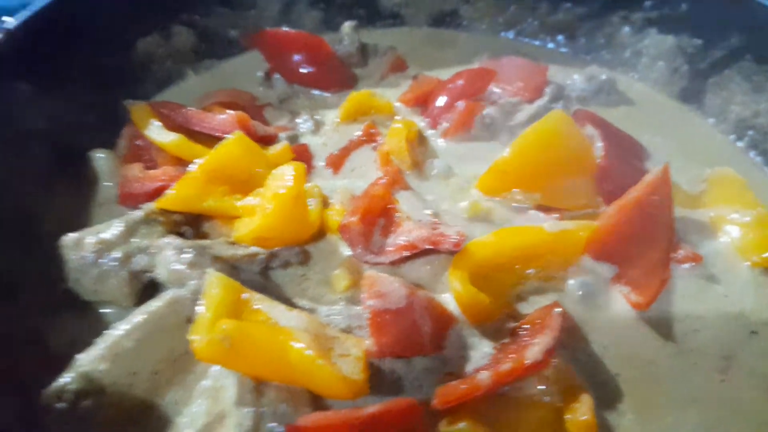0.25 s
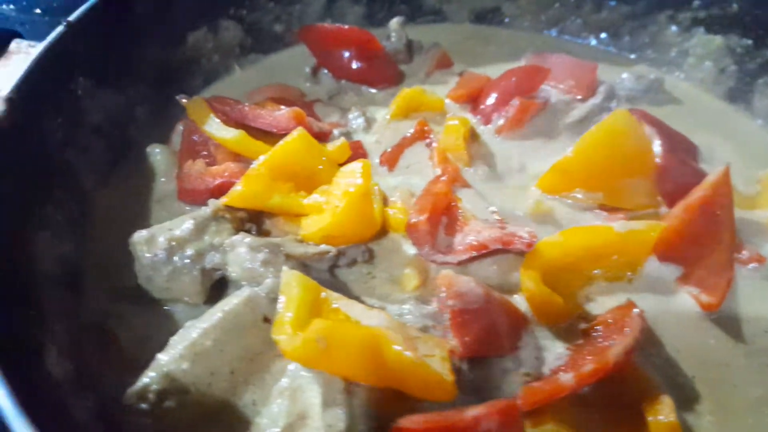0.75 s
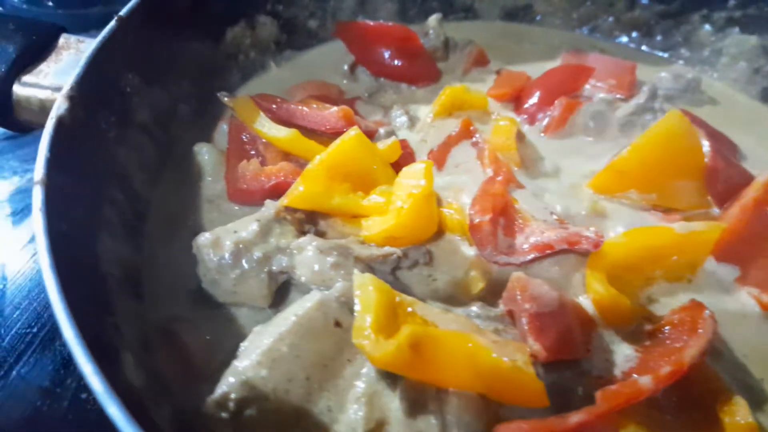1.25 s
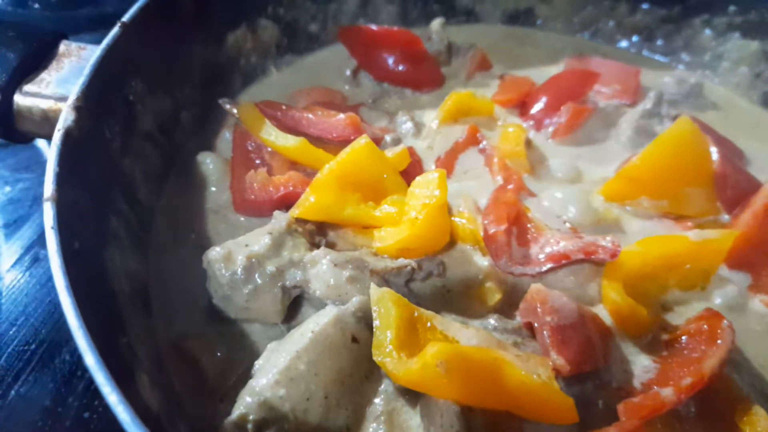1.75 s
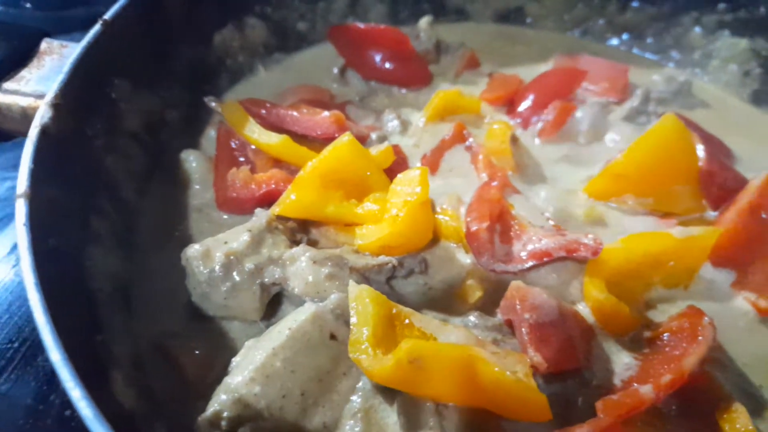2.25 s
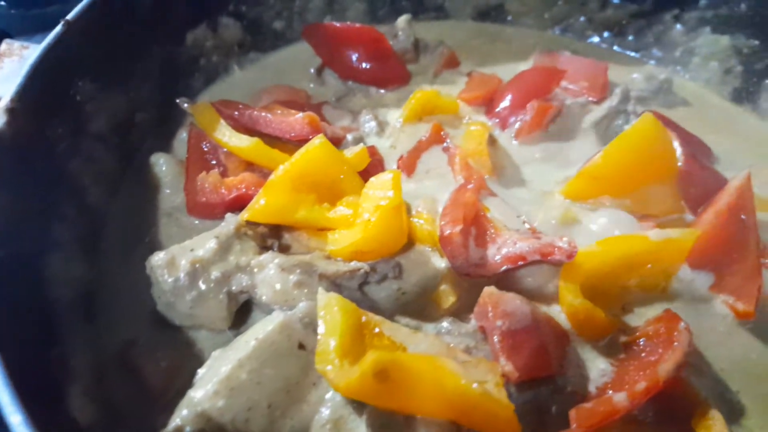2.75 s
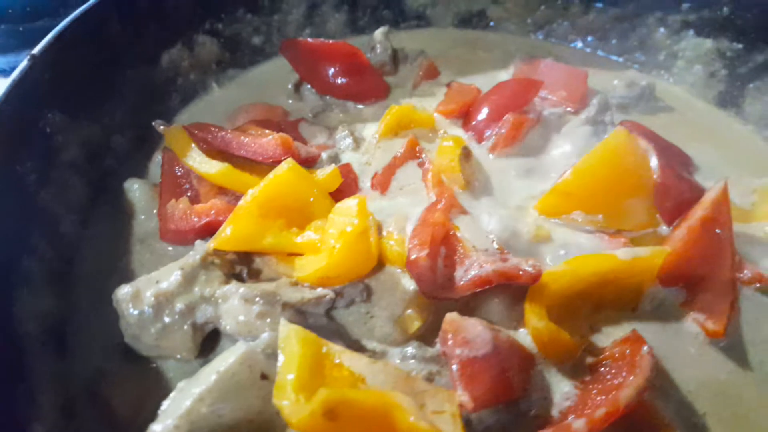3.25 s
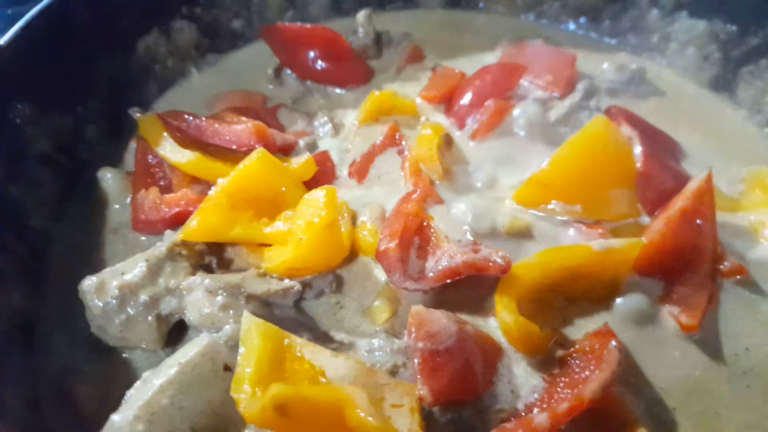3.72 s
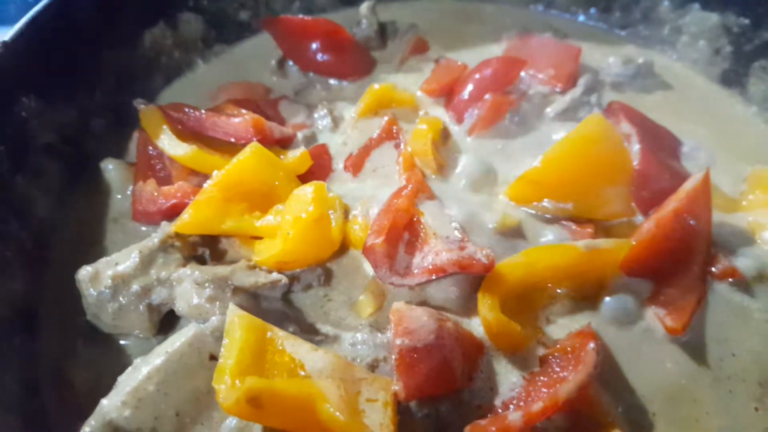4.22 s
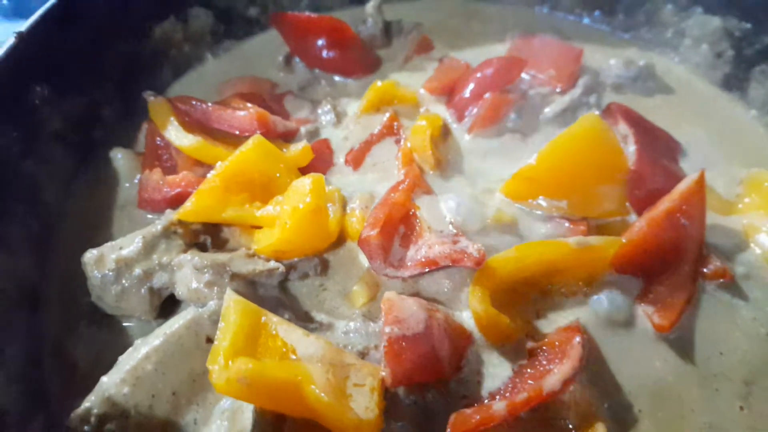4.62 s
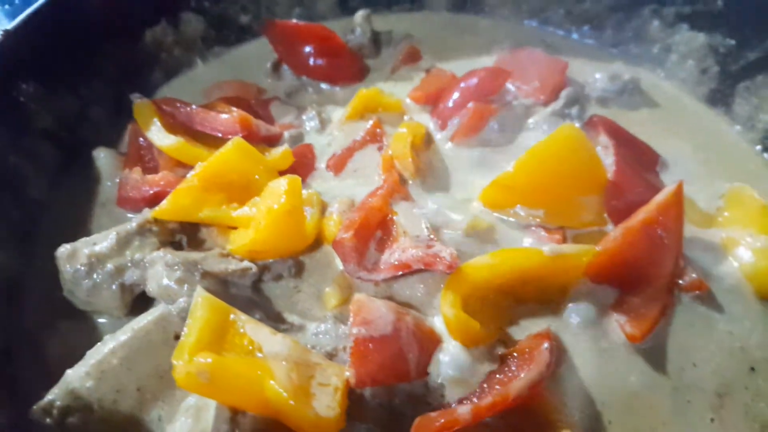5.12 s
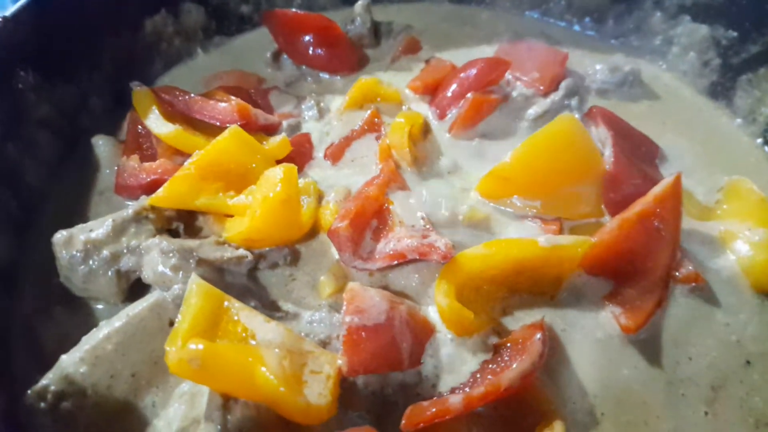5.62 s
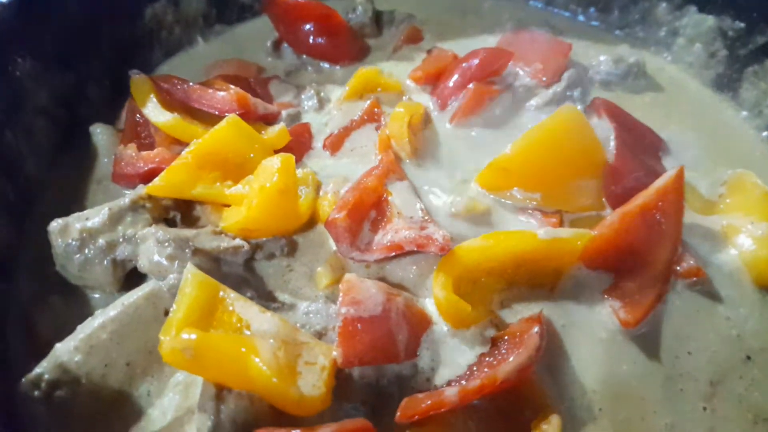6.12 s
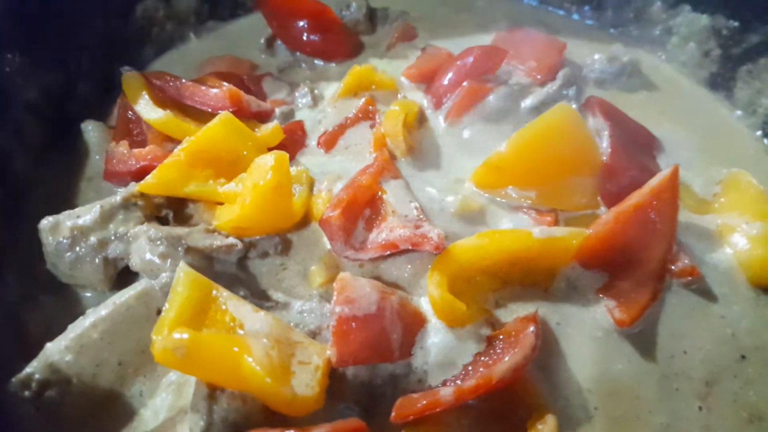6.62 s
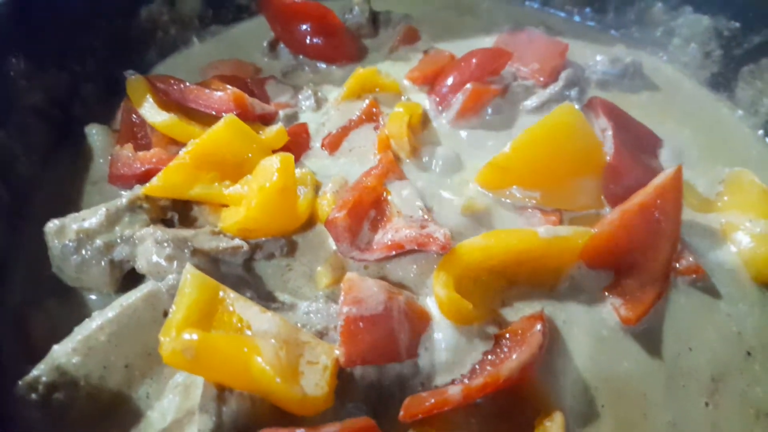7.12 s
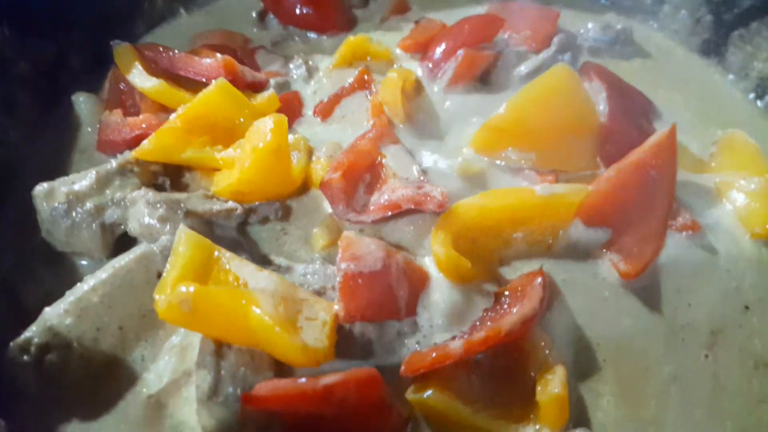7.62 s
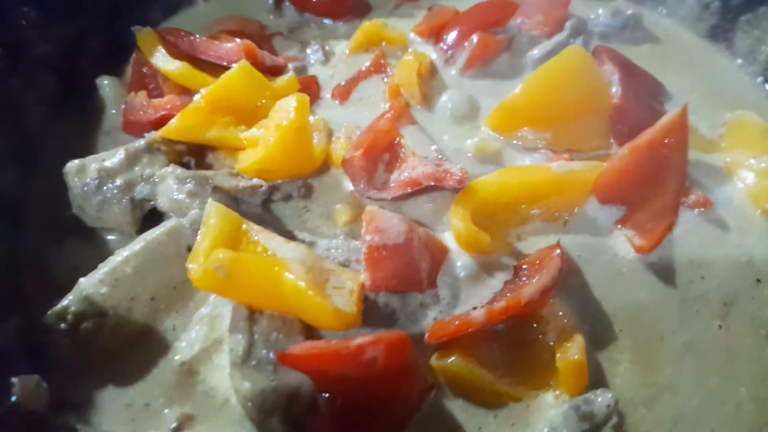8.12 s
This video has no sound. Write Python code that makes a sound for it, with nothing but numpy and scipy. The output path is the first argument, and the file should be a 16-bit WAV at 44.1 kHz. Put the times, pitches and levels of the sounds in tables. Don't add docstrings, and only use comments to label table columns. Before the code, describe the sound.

A creamy sauce with chunks of peppers and tomato simmers in a frying pan, heard very close in a small kitchen. Hollow bubble pops and sharp little cracks come in irregular clusters over fine fizzing steam and a steady low hum. One pop stands out near two seconds; around five the burner swells and a hard crack lands with a brief sizzle. Another hard crack comes near the end, and the simmering continues.

```python
import sys
import numpy as np
from scipy import signal
from scipy.io import wavfile
from scipy.ndimage import uniform_filter1d

SR = 44100
rng = np.random.default_rng(int(sys.argv[2]) if len(sys.argv) > 2 else 0)


def output_pcm(signal):
    pcm = np.clip(np.atleast_2d(signal).T, -1, 1) * 32767
    wavfile.write(sys.argv[1], SR, np.round(pcm).astype(np.int16))


def voltage_ratio(decibels):
    exponent = np.asarray(decibels, float) / 20
    return 10 ** exponent


N = 369111

# frequency in Hz, level in dB.
LEFT_PORT_COLOUR = [(400, -3.5), (700, 5), (1600, 0), (2100, -3.5), (3200, -1.5), (6300, -8.5), (8800, -6),
                    (10100, -25), (12000, -26), (15700, -38)]
RIGHT_PORT_COLOUR = [(400, -2), (1700, 1), (2300, -5), (4000, -4.5), (5500, -2.5), (7600, -9), (8800, -23),
                     (13000, -29.5), (15000, -26), (15600, -31)]
# start in seconds, peak in dB, ring in Hz.
SKIN_CRACKS = [(0.36, -28, 3800), (0.3975, -29.5, 3200), (1.2354, -24.5, 3100), (1.26, -31, 4100),
               (1.4203, -25.5, 3020), (1.4243, -26.5, 5700), (1.709, -26.5, 4230), (1.8638, -27.5, 3080),
               (2.1476, -29.5, 2470), (2.938, -28, 3560), (3.299, -25, 3440), (3.6037, -24, 3860),
               (4.311, -26.5, 3100), (4.316, -28, 3080), (4.4076, -26, 3940), (4.604, -29.5, 4030),
               (4.737, -23, 4330), (5.004, -26, 3930), (5.122, -18, 3580), (5.136, -30, 5700),
               (5.4236, -27, 3750), (6.053, -28.5, 5300), (6.914, -21.5, 3680), (6.923, -29, 3970),
               (6.978, -26, 3970), (7.094, -27, 3660), (7.128, -23, 3600), (7.355, -27.5, 3700),
               (7.7184, -17.5, 3730), (7.822, -21.5, 2760), (7.934, -48, 2730), (8.101, -36, 2900),
               (8.237, -27, 2980)]
# start in seconds, peak in dB, ring in Hz.
MORE_CRACKS = [(0.182, -28, 3660), (0.505, -33, 3770), (0.543, -33, 3100), (0.726, -32, 3820),
               (0.754, -36, 4160), (0.851, -32.5, 2570), (0.9724, -33, 3040), (1.1198, -29.5, 3330),
               (1.5834, -31, 4100), (1.638, -32.5, 3140), (1.7816, -30.5, 4200), (1.933, -31, 3020),
               (2.082, -28.5, 4080), (2.165, -33, 4940), (2.309, -35, 4000), (2.753, -30, 2780),
               (2.79, -29, 4100), (3.145, -31.5, 3880), (3.4868, -34, 3010), (3.9572, -29, 3950),
               (5.25, -30, 3670), (5.487, -30.5, 3560), (5.64, -31, 3600), (6.2597, -30.5, 5470),
               (7.3807, -28.5, 3080), (8.159, -36, 3870)]
# start in seconds, peak in dB, ring in Hz.
FAINT_SNICKS = [(0.017, -33.5, 4600), (0.043, -39, 2970.0), (0.113, -36, 2950), (0.7208, -36.5, 3700.0),
                (0.9663, -32, 2660), (1.9863, -35.5, 2850), (2.1394, -31, 2910.0), (2.314, -33.5, 3910.0),
                (2.781, -29.5, 2750), (2.962, -37, 2760), (3.0484, -32.5, 2730.0), (3.1811, -38, 3850.0),
                (7.4865, -40.5, 2800), (3.7417, -33, 2590.0), (3.776, -33.5, 3220), (4.016, -32, 3330),
                (4.0818, -35, 4000), (4.3017, -31, 4480.0), (4.3266, -32, 2980), (4.571, -38, 2900.0),
                (4.575, -36, 4050.0), (4.598, -29, 3300), (4.65, -34.5, 4030.0), (4.6788, -37.5, 2590.0),
                (4.979, -34, 3250), (5.093, -35, 3400.0), (5.346, -32.5, 4800), (5.367, -34, 3510.0),
                (5.417, -28, 2750), (5.539, -34, 2650), (5.7747, -42, 4970.0), (5.8695, -40, 4770),
                (5.8935, -40, 2700), (6.199, -37, 3050), (6.4698, -35, 3500), (6.712, -40, 3100),
                (6.9717, -30, 2650), (7.105, -35, 2980.0), (7.2731, -34, 4000), (7.29, -36, 3990.0),
                (7.312, -36, 3120.0), (7.4227, -35, 4700), (7.573, -36, 3300), (7.6999, -32, 2280),
                (7.7067, -33, 5750.0), (7.764, -30.5, 2850), (8.154, -33, 6380.0), (8.247, -30, 2680)]
# start in seconds, peak in dB, finest spray in dB above the rest.
BURST_SPITS = [(0.2156, -32, -3), (0.8484, -33.5, -7), (1.7094, -31, -26), (1.938, -39, -4),
               (1.9993, -42, -1), (2.3019, -34, -5.5), (2.4623, -32.5, -7), (2.597, -34.5, -3),
               (2.9615, -50.5, 13), (3.0942, -36, -5), (3.5176, -33, -10), (3.6033, -35, -30),
               (3.833, -34, -43), (3.8846, -40, -4), (3.9676, -34.5, -4), (4.224, -29, -10),
               (4.382, -34, -4), (4.7367, -26.5, -9), (5.0053, -33, -8), (5.122, -25, -8),
               (5.1305, -37, -16), (5.1374, -28.5, -8), (6.055, -32.5, -6.5), (6.3808, -33, 0),
               (6.915, -42, -3), (6.9488, -36.5, -1), (6.988, -47, 2), (7.8546, -32, -81),
               (8.1726, -38.5, 1), (8.1763, -34.5, -26)]


def evened(x):
    return x / np.sqrt(np.mean(x ** 2) + 1e-20)


def read(points, hz):
    f, value = np.transpose(points)
    return np.interp(np.log(hz + 1), np.log(f + 1), value)


def along(rows, t):
    return np.interp(t, *np.transpose(rows))


def add(mix, s, sound):
    part = mix[:, max(round(s * SR), 0):][:, :sound.shape[1]]
    part += sound[:, :part.shape[1]]


def smoothed_noise(size):
    once = uniform_filter1d(rng.standard_normal(N), size=size)
    return evened(uniform_filter1d(once, size=size))


def ports(x):
    hz = abs(np.fft.fftfreq(4096, 1 / SR))
    gain_db = np.array([read(LEFT_PORT_COLOUR, hz), read(RIGHT_PORT_COLOUR, hz)])
    spectrum = np.exp(np.conj(signal.hilbert(np.log(voltage_ratio(gain_db)))))
    taps = np.fft.ifft(spectrum).real[:, :1024]
    return signal.oaconvolve(x, taps, axes=1)[:, :N]


def lean(hz, side):
    pan_db = read(LEFT_PORT_COLOUR, hz) - read(RIGHT_PORT_COLOUR, hz) + 5.2 * (side - .5)
    return voltage_ratio(np.array([[.5], [-.5]]) * pan_db)


def ring(hz, cycles, swell, phase=np.pi, glide=0):
    turns = np.arange(600) / SR * hz
    shape = (1 - np.exp(-turns / swell)) ** 2 * np.exp(-turns / cycles)
    bent_turns = turns * (1 + glide * (turns - 2 * cycles) / 2)
    return shape / shape.max() * np.sin(2 * np.pi * bent_turns + phase)


def hum():
    # time in seconds, hum level in dB.
    level = [(0.0, -36), (1.2, -38.5), (2.4, -37), (3.6, -36), (4.8, -36.5), (6.0, -35), (7.2, -35.5),
             (8.4, -35.5)]
    # frequency in Hz, level in dB per Hz.
    colour = [(40, -27), (59, 2.5), (68, -3), (97, 4), (133, -4), (168, -6), (200, -12.5), (262, -6),
              (330, -14.5), (435, -26), (520, -27), (565, -21), (1085, -28), (1400, -47)]
    # time in seconds, level in dB.
    roar = [
        (0, -48),
        (4.7, -49),
        (5.0, -42.5),
        (5.7, -47.5),
        (6.1, -50),
        (7.3, -45.5),
        (8.37, -51.5),
    ]
    # frequency in Hz, left-right likeness (0-1).
    likeness = [(60, 0.98), (130, 0.98), (290, 0.92), (640, 0.39), (1400, 0.11)]
    # frequency in Hz, left over right in dB.
    balance = [(90, -0.5), (140, -4.5), (330, -3.5), (500, -2.5), (1100, -3.5)]
    frames, hz = N // 2048 + 5, np.fft.rfftfreq(8192, 1 / SR)
    a, b, c, d = rng.standard_normal((frames, 4097, 4)).T
    same = np.clip(read(likeness, hz), -1, 1)[:, None]
    left = a + 1j * b
    right = same * left + np.sqrt(1 - same ** 2) * (c + 1j * d)
    lean_db = np.outer([.5, -.5], read(balance, hz))
    roar_db = along(roar, np.arange(frames) * 2048 / SR - .05)
    flame = np.exp(-(np.log((hz + 1) / 314) / 0.2) ** 2)
    colour_db = (read(colour, hz) + lean_db)[:, :, None]
    z = np.array([left, right]) * voltage_ratio(colour_db + np.outer(flame, roar_db - roar_db.mean()))
    x = evened(signal.istft(z, nperseg=8192, noverlap=6144)[1][:, :N])
    return x * voltage_ratio(along(level, np.arange(N) / SR) - 1.0)


def duct():
    # frequency in Hz, width in Hz, level in dB.
    whistles = [(557, 11.6, -57.5), (1047, 13, -66)]
    out = np.zeros(N)
    for hz, width, db in whistles:
        resonance = signal.iirpeak(hz, hz / width, fs=SR)
        out += voltage_ratio(db) * evened(signal.lfilter(*resonance, rng.standard_normal(N)))
    return out


def self_noise():
    band = signal.butter(6, [11000, 14600], "bandpass", fs=SR, output="sos")
    hiss = evened(signal.sosfilt(band, rng.standard_normal(N)))
    return np.array([[0], [voltage_ratio(-62)]]) * hiss


def all_pops():
    # start in seconds, peak in dB, cavity in Hz, ring in cycles.
    blips = [(0.2202, -31, 1290, 2.1), (0.449, -27.5, 1606, 4.1), (0.8993, -30.5, 1740, 1.7),
             (1.7485, -30, 1110, 2.6), (1.9292, -27, 1840, 1.5), (2.3851, -25.5, 1820, 1.5),
             (2.4293, -23, 1090, 1.1), (2.7158, -31, 683, 2.2), (3.18, -33, 1630, 2.5),
             (3.6128, -29, 1700, 2.6), (4.0807, -29, 1470, 1.5), (4.464, -32.5, 1550, 3.4),
             (4.72, -27.5, 1590, 1.7), (4.8034, -30, 984, 1.3), (5.4494, -27, 1650, 3.4),
             (5.7155, -31.5, 1920, 2.9), (6.0122, -35, 1090, 2.2), (6.0325, -31, 1480, 1.7),
             (6.0683, -33, 1400, 1.9), (6.2584, -31.5, 1580, 1.6), (6.516, -32, 1640, 10),
             (6.7074, -29, 1710, 1.3), (6.8988, -28, 1430, 1.7), (7.0965, -26.5, 1580, 1.7),
             (7.1096, -28.5, 1820, 2), (7.359, -28, 1760, 1.3), (7.6595, -29.5, 1260, 1.7),
             (7.981, -35, 1090, 2.7), (8.029, -28, 1120, 0.74), (8.2549, -30.5, 1760, 1.4)]
    # start in seconds, peak in dB, cavity in Hz.
    plops = [(0.0615, -25, 830), (0.0862, -31, 1190), (0.142, -30.5, 790), (0.3039, -34, 720),
             (0.9525, -24, 1260), (1.088, -34, 745), (1.2525, -27, 1190), (1.3977, -32, 1090),
             (1.6492, -31, 1090), (1.9024, -31, 890), (2.5507, -26, 1010), (2.6205, -32.5, 810),
             (3.095, -27.5, 895), (3.285, -29.5, 920), (3.3555, -33, 980), (3.67, -32, 744),
             (3.733, -30, 950), (3.777, -29, 1110), (4.3442, -30, 940), (4.9321, -23, 800),
             (4.979, -29, 860), (5.0056, -31, 766), (5.294, -30, 820), (5.5979, -27.5, 1100),
             (5.7072, -27.5, 1030), (6.284, -34, 905), (6.4314, -30, 960), (6.9143, -32.5, 1160),
             (7.9075, -25.5, 1040), (8.3622, -28, 700)]
    # start in seconds, peak in dB, cavity in Hz.
    pips = [(0.0171, -30.5, 1550), (0.181, -29, 1660), (0.435, -29.5, 1540), (0.6988, -25.5, 1690),
            (0.828, -27, 1580), (1.2066, -22.5, 1430), (1.8637, -13.5, 1700), (1.9222, -25.5, 1710),
            (1.9993, -26, 1820), (2.1033, -27, 1480), (2.1394, -26.5, 1740), (2.452, -24, 1830),
            (3.169, -27, 1440), (4.311, -26, 1580), (5.0932, -26.5, 1290), (5.226, -24.5, 1250),
            (5.3218, -28.5, 1750), (5.7542, -21, 2390), (5.7898, -27, 1470), (5.805, -23, 2510),
            (5.812, -27.5, 1390), (6.3203, -25.5, 1490), (6.3363, -28, 1430), (6.483, -25.5, 1430),
            (6.529, -25, 1800), (6.6771, -25.5, 1370), (7.2605, -28, 1480), (7.3375, -25, 1550),
            (7.5683, -26, 1470), (8.2374, -27, 2250)]
    # start in seconds, peak in dB, cavity in Hz.
    further_pops = [(0.339, -36.5, 776), (1.052, -32.5, 990), (1.5, -32.5, 1680), (2.272, -33.5, 1120),
                    (2.296, -33, 1090), (2.818, -38, 706), (3.478, -36, 1070), (3.505, -30.5, 1630),
                    (3.879, -33, 655), (4.555, -30, 1350), (5.438, -29, 1480), (5.528, -31.5, 1150),
                    (3.6093, -30, 1430), (5.848, -31.5, 600), (5.891, -34, 1750), (7.116, -34, 1940),
                    (7.196, -32.5, 1610), (7.5735, -28, 1390), (8.246, -30.5, 1690), (0.417, -33, 1760),
                    (2.565, -31, 1610), (2.8965, -31, 1800), (4.811, -33, 1600), (7.299, -36, 1400),
                    (3.368, -31, 1440), (7.534, -29, 2380), (7.613, -31, 1560), (8.328, -36, 1540)]
    # start in seconds, peak in dB, cavity in Hz.
    pearls = [(0.3564, -30.5, 1800), (1.2587, -35, 980), (1.7081, -31, 1680), (2.3616, -35, 830),
              (2.6027, -38, 725), (2.9389, -37, 1020.0), (2.9853, -38, 694), (3.0469, -38, 570),
              (3.4407, -34.5, 1520), (3.5478, -36.5, 760.0), (3.8674, -36, 1000), (3.9565, -34, 1030),
              (4.0153, -35, 770), (4.0962, -37, 1030), (4.9013, -33.5, 676), (4.9524, -32, 830.0),
              (5.1232, -33, 1890), (5.2092, -35, 940.0), (5.2157, -40, 1120), (5.2413, -33, 570),
              (5.3085, -30.5, 1060), (5.3664, -38, 1040.0), (5.4156, -34, 1030), (5.4866, -37, 1720.0),
              (5.6382, -37, 714), (5.8042, -28.5, 970), (5.8768, -34, 1030), (6.0058, -33, 730),
              (6.2203, -34, 820), (6.2445, -39, 750), (6.3614, -34, 1540), (6.3896, -35, 720),
              (6.4402, -34, 1360), (6.5077, -35.5, 820), (6.5576, -36.5, 710.0), (6.7844, -36.5, 710),
              (6.8856, -34, 1130), (6.9545, -31, 1470), (6.9807, -32.5, 1050), (7.2285, -38, 700),
              (7.3801, -36, 1620), (7.5107, -38, 726), (7.6999, -28, 1780), (8.1597, -31, 1670),
              (8.2056, -30, 1050), (8.2248, -44, 1140.0), (8.2646, -39, 1020)]
    closing = ((plops, 0.68), (pips, 0.66), (further_pops, 1.27), (pearls, 1))
    return list(blips) + [(*row, cycles) for rows, cycles in closing for row in rows]


def boil():
    rise_s, fall_s = 0.009, 0.028
    surge_db, calm_db, follows = 0.5, -2, 0.4
    t = np.arange(0, N, 64) / SR
    power = voltage_ratio(2 * calm_db)
    bursts = all_pops() + list(SKIN_CRACKS) + list(MORE_CRACKS) + list(FAINT_SNICKS) + list(BURST_SPITS)
    for s, db, *_ in bursts:
        away = np.where(t < s, (s - t) / rise_s, (t - s) / fall_s)
        power = power + voltage_ratio(2 * (surge_db + follows * (db + 30))) * np.exp(-away ** 2)
    return np.interp(np.arange(N) / SR, t, 10 * np.log10(power))


def steam(boil_db):
    hiss = evened(ports(rng.standard_normal((2, N))))
    return voltage_ratio(-53.0) * hiss * voltage_ratio(1.8 * smoothed_noise(200) + .34 * boil_db)


def gurgle(boil_db):
    starts = rng.random(N) < 30 * voltage_ratio(boil_db) / SR
    size = voltage_ratio(3 * np.minimum(rng.exponential(1, N), 3)) * starts
    kind = rng.integers(0, 6, N)
    lumps = np.zeros(N)
    for k, hz in enumerate(np.geomspace(234, 683, 6)):
        lumps += signal.oaconvolve(size * (kind == k), ring(hz, 0.5, 0.4))[:N]
    return voltage_ratio(-57.5 + np.array([[-1.5], [0]])) * evened(lumps)


def fizz(boil_db):
    out = np.zeros((2, N))
    per_s = 650 * voltage_ratio(1.9 * boil_db)
    size = np.minimum(.2 + rng.exponential(1, N), 1.3) * (rng.random(N) < per_s / SR)
    kind = rng.integers(0, 24, N)
    for k, hz in enumerate(np.geomspace(420, 15000, 24)):
        cycles, step, side = rng.uniform([1.5, -1, 0], [5, 1, 1])
        lag = step * 2 * np.pi * hz * 0.0001
        pair = np.array([ring(hz, cycles, 0.37, 0), ring(hz, cycles, 0.75, lag)])
        pair *= np.array([[1 + side], [2 - side]]) * (hz / 2000) ** 0.84 / cycles ** .5
        hits = voltage_ratio(size * (11.5 - 0.1 * k)) * (size > 0) * (kind == k)
        out += signal.oaconvolve(hits[None], pair, axes=1)[:, :N]
    return voltage_ratio(-51.5 + 0.049 * boil_db) * evened(ports(out))


def sizzles():
    # start in seconds, length in seconds, level in dB.
    collapses = [
        (0.71, 0.052, -52),
        (5.126, 0.04, -45),
        (5.722, 0.03, -40.5),
        (7.13, 0.035, -49),
        (7.308, 0.052, -49),
    ]
    out = np.zeros((2, N))
    for s, length, db in collapses:
        u = np.arange(4000) / SR / length
        ragged = uniform_filter1d(rng.standard_normal(4000), size=60) ** 2 * 60 + .5
        swell = np.sqrt(u) * np.exp(-u ** 2)
        add(out, s, voltage_ratio(db) * swell * ragged * rng.standard_normal((2, 4000)))
    band = signal.butter(2, [2300, 6800], "bandpass", fs=SR, output="sos")
    return ports(signal.sosfilt(band, 2 * out))


def droplets():
    # start in seconds, peak in dB.
    drops = [(0.488, -39), (0.8924, -44.5), (0.997, -48), (1.2815, -39), (1.304, -42), (1.503, -41),
             (2.147, -37.5), (2.7945, -37), (4.252, -36.5), (4.368, -37.5), (4.556, -46), (4.689, -41),
             (4.9496, -41), (5.514, -47), (5.5627, -41.5), (5.8543, -37), (6.431, -43), (6.4686, -38),
             (6.6344, -41), (6.7222, -38.5), (6.873, -43), (7.066, -43.5), (7.0277, -37.5), (7.33, -39),
             (7.509, -40), (7.6092, -36), (7.6854, -34), (7.8664, -41)]
    return [(s, db, -10 + 9.5 * share) for (s, db), share in zip(drops, rng.random(len(drops)))]


def spits():
    # start in seconds, peak in dB.
    mists = [(0.0175, -37), (1.9954, -41), (2.1636, -37), (2.7553, -37), (3.3084, -38), (3.833, -26),
             (4.7215, -35), (5.15, -43), (5.2585, -39), (5.3454, -35), (5.5035, -45), (5.5165, -34),
             (5.6388, -42), (5.881, -40), (6.2183, -38), (6.2319, -46), (6.5625, -40), (7.101, -32),
             (7.334, -44), (7.3552, -38), (7.718, -41), (7.8583, -31), (8.1872, -40), (8.2055, -35)]
    coarse, fine = np.zeros((2, 2, N))
    bursts = list(BURST_SPITS) + droplets()
    bursts += [(s, db - 13.5, -9) for s, db, hz in SKIN_CRACKS + MORE_CRACKS + FAINT_SNICKS]
    bursts += [(s, db - 24, 13.5) for s, db in mists]
    u = np.arange(900) / SR / 0.00095
    snap = u ** 2 * np.exp(2 - 2 * u)
    hissing_tail = 0.041 * (1 - np.exp(-u)) * np.exp(-u / 7)
    spray = rng.standard_normal((len(bursts), 2, 900)) * (snap + hissing_tail)
    for (s, db, fine_db), drops in zip(bursts, spray):
        add(coarse, s - .0006, drops * voltage_ratio(db + 12.5))
        add(fine, s - .0006, drops * voltage_ratio(db + fine_db + 28.5))
    middle = signal.butter(2, [3500, 9800], "bandpass", fs=SR, output="sos")
    top = signal.butter(3, 10000, "highpass", fs=SR, output="sos")
    return ports(signal.sosfilt(middle, coarse) + signal.sosfilt(top, fine))


def cracks():
    # start in seconds, peak in dB, ring in Hz.
    pings = [(0.0439, -36, 8270.0), (0.2158, -20, 8400), (0.2354, -24, 7100), (1.7879, -28, 7400),
             (1.9884, -35, 8840.0), (2.2056, -27, 6800), (2.3143, -28, 8750), (2.5501, -35, 8570.0),
             (2.7548, -36.0, 8840.0), (2.7624, -37.0, 8530.0), (3.1636, -31, 8750), (3.2993, -36, 7390.0),
             (3.3087, -36, 7180.0), (3.5174, -26, 6890.0), (3.603, -18, 6860.0), (3.8759, -36, 8700.0),
             (4.043, -30, 6690.0), (4.3267, -26, 8450.0), (4.5978, -28, 7900), (4.8364, -28, 7100),
             (4.9205, -26, 7020.0), (4.9908, -33, 8900.0), (5.1312, -30, 8690.0), (1.219, -43, 5600),
             (5.7749, -34, 8800), (5.8433, -32, 8880.0), (5.87, -24, 7520.0), (5.9918, -29, 7500),
             (6.3267, -24, 6900), (6.482, -29, 7960.0), (6.5137, -30.5, 9200), (6.636, -39, 8500),
             (6.728, -35, 8600.0), (7.101, -35.5, 6980.0), (7.2338, -24, 8600), (7.8673, -24, 9000),
             (8.1551, -38, 6500.0), (8.1764, -35, 8460.0)]
    skins = SKIN_CRACKS + MORE_CRACKS + FAINT_SNICKS + [(s, db - 8.5, hz) for s, db, hz in pings]
    out, chance = np.zeros((2, N)), rng.random((len(skins), 3))
    for (s, db, hz), (size, step, side) in zip(skins, chance):
        cycles = (0.00051 + 0.00017 * size) * hz
        pair = np.array([ring(hz, cycles, 0.6), ring(hz, cycles, 0.7, np.pi + 1.9 * (step - .5))])
        level = voltage_ratio(db - 2.0 + np.array([[1.2], [-1.2]]))
        add(out, s - .00035, pair * level * lean(hz, side))
    return out


def pops():
    bubbles = all_pops()
    out, chance = np.zeros((2, N)), rng.random((len(bubbles), 2))
    for (s, db, hz, cycles), (distance, side) in zip(bubbles, chance):
        lags = (0, 2 * np.pi * hz * 0.0003 * (side - .5))
        cavity = np.array([ring(hz, 1.76 * cycles, 0.19, np.pi + lag, glide=0.0123) for lag in lags])
        shove = 0.5 * ring(0.44 * hz, 0.65, 0.038, 0)
        tone = (cavity + shove) * voltage_ratio(db - 2.5) * lean(hz, side)
        add(out, s - .0003, tone)
        add(out, s + 0.00303 + 0.00198 * distance, voltage_ratio(-9.5) * tone)
    return out


def pan_boom():
    mode_hz, width_hz = 287, 64
    t, out = np.arange(2000) / SR, np.zeros((2, N))
    shape = (1 - np.exp(-t / 0.0018)) * np.exp(-np.pi * width_hz * t)
    boom = shape * np.sin(2 * np.pi * mode_hz * t)
    for s, db, *_ in all_pops():
        add(out, s, voltage_ratio(-41 + 0.73 * (db + 40.5) + np.array([[-1.5], [1.5]])) * boom)
    return out


def wall(x):
    # frequency in Hz, width in Hz, level in dB.
    modes = [(653, 53, -2.5), (1090, 32, 0), (1630, 97, -9)]
    return sum(voltage_ratio(db) * signal.lfilter(*signal.iirpeak(hz, hz / width, fs=SR), x)
               for hz, width, db in modes)


def pan_tail(x):
    # frequency in Hz, 60 dB decay time in seconds.
    decay_times = [(500, 0.024), (3000, 0.073), (10000, 0.039)]
    taps = np.zeros((5, 2, 6000))
    at = np.arange(40, 5980, 20) + rng.integers(0, 20, (5, 2, 297))
    np.put_along_axis(taps, at, rng.choice([-1., 1.], at.shape), 2)
    decay = np.exp(-np.log(1000) * np.arange(6000) / SR / np.array(decay_times)[:, 1:])
    under_1500 = signal.filtfilt(*signal.butter(2, 1500, fs=SR), taps)
    under_6000 = signal.filtfilt(*signal.butter(2, 6000, fs=SR), taps)
    tails = under_1500 * decay[0] + (under_6000 - under_1500) * decay[1] + (taps - under_6000) * decay[2]
    place = np.repeat(rng.integers(0, 5, N // 400 + 1), 400)[:N]
    wet = (signal.oaconvolve(x * (place == k), tail, axes=1)[:, :N] for k, tail in enumerate(tails))
    return sum(wet) / np.linalg.norm(tails[0, 0])


def scene():
    boil_db = boil()
    hiss = self_noise() * voltage_ratio(0.19 * boil_db + 2.2 * smoothed_noise(900))
    background = hum() + duct() + hiss + steam(boil_db)
    bubbles = gurgle(boil_db) + fizz(boil_db) + sizzles() + spits() + cracks() + pops()
    pan = pan_boom() + wall(bubbles) + voltage_ratio(-4) * pan_tail(bubbles)
    return background + bubbles + pan


def band_limit(x):
    return signal.sosfilt(signal.butter(12, 16510, fs=SR, output="sos"), x)


def record(dry):
    under, wider = (signal.oaconvolve(dry, signal.firwin(255, hz, fs=SR)[None], "same")
                    for hz in (15750, 16500))
    power = uniform_filter1d(((wider - under) ** 2).sum(0), size=100)
    attack = uniform_filter1d(1. * (power > 7 * np.median(power)), size=60)
    return band_limit(under + voltage_ratio(-10) * attack * (wider - under))


dry = scene()
out = record(dry)
output_pcm(out)
```